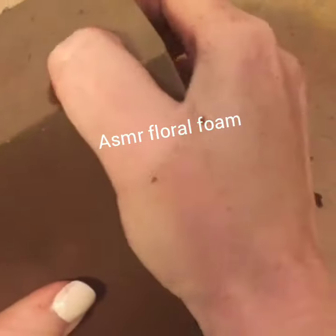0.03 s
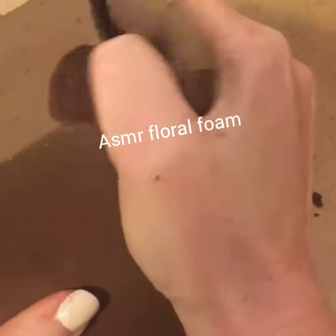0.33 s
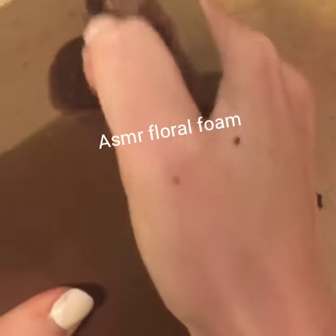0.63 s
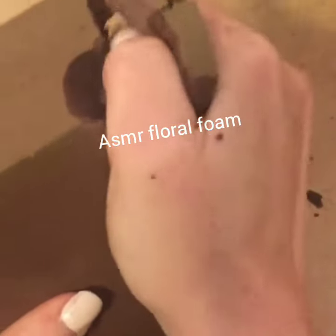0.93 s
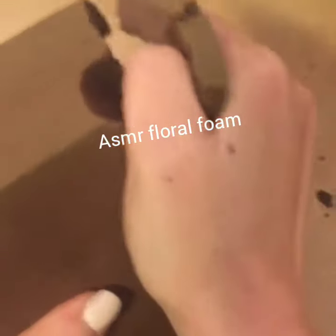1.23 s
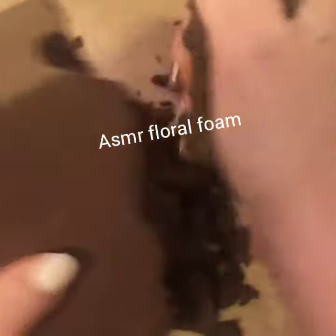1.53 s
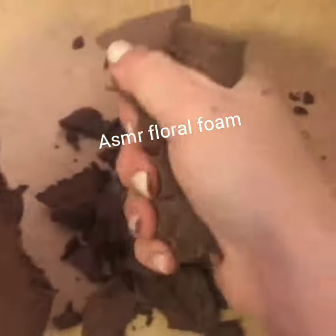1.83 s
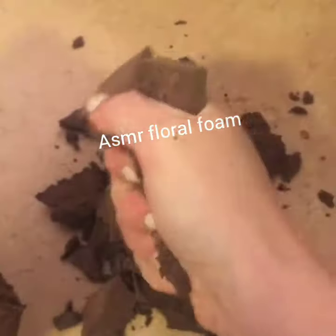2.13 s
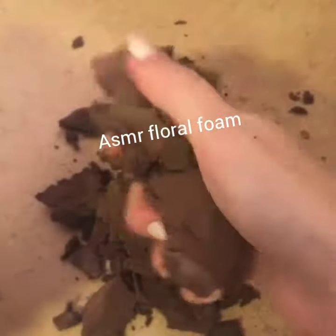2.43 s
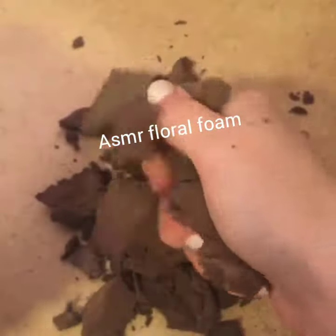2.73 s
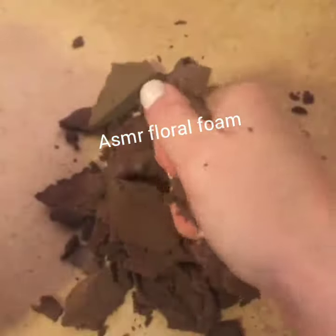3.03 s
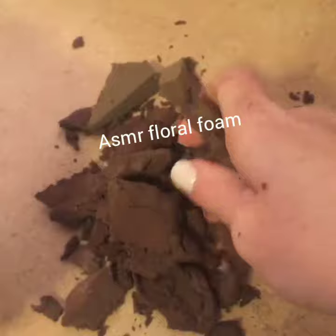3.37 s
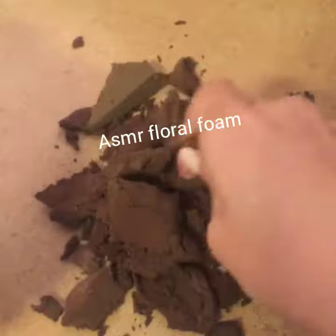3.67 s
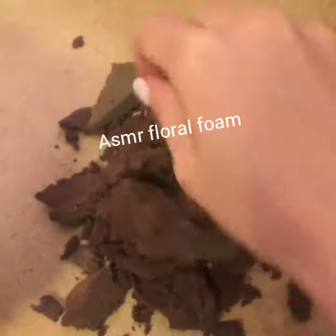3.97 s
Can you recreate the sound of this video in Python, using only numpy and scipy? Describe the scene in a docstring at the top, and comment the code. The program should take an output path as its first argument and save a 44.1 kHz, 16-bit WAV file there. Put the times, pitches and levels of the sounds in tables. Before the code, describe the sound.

Dry floral foam crunches and cracks as a hand crushes it to crumbs.

```python
"""A hand breaks dry floral foam close to a phone, in a small room where an appliance motor hums faintly.
First the fingers crunch into the block: brittle cell walls collapse in dense showers of clicks, with
sharp fractures and hollow knocks. Just after a second comes the loudest crack, and a lump bumps on
the table. The hand gathers the lumps and grinds them to crumbs, some snapping with a tick.
From about three seconds on, the pieces rub softly and die away."""
import sys
import numpy as np
from scipy import signal
from scipy.fft import rfft, irfft
from scipy.io import wavfile

SR = 44100
rng = np.random.default_rng(int(sys.argv[2]) if len(sys.argv) > 2 else 0)


def to_wav(sig):
    """Store sig (one row per channel, or 1-D mono) as 16-bit WAV at the path in sys.argv[1].

    Samples outside -1..1 are clipped; the rate is SR.
    """
    pcm = np.clip(np.atleast_2d(sig), -1, 1) * 32767
    pcm = np.round(pcm).astype(np.int16)
    wavfile.write(sys.argv[1], SR, pcm.T)  # frames by channels


N = 176400
TOP_HZ = 13850  # upper edge of the phone's range
FREQS = np.maximum(np.arange(2049) * SR / 4096, 1)  # f/Hz grid of every EQ curve

# tone colour of loose crumbs: f/Hz, level/dB
CRUMB_EQ = [(750, -5.5), (1500, 0), (2700, -3), (3700, 0), (5000, -2.5), (6200, 0.5), (7900, -1.5),
            (12500, -1.5)]


def undb(db):
    """Decibels to gain."""
    return 10 ** (np.asarray(db) / 20)


def unit(x):
    """Scale to rms 1."""
    return x / np.sqrt(np.mean(x ** 2) + 1e-18)


def add(out, x, start):
    """Mix x into out from start seconds on."""
    i = int(round(start * SR))
    a, b = max(i, 0), min(i + len(x), len(out))
    if b > a:
        out[a:b] += x[a - i:b - i]


def wander(turns_per_s, size):
    """A random modulator of rms 1, gliding from value to value."""
    position = np.arange(size) * turns_per_s / SR
    return unit(np.interp(position, np.arange(512), rng.standard_normal(512)))


def colour(points, tilt_db=0):
    """An EQ curve in dB through the points, tilted by tilt_db per octave about 4 kHz."""
    hz, db = np.array(points).T
    octaves = np.log2(np.clip(FREQS, 700, 14000) / 4000)
    return np.interp(np.log(FREQS), np.log(hz), db) + tilt_db * octaves


def bell(hz, width_hz):
    """The outline of one resonance, 1 at its centre."""
    return 1 / (1 + (2 * (FREQS - hz) / width_hz) ** 2)


def equalise(x, curve_db):
    """Minimum-phase EQ, so clicks never pre-ring; white input keeps its power, counted below TOP_HZ."""
    gain = undb(curve_db)
    gain /= np.sqrt(np.mean(gain ** 2 * (FREQS < TOP_HZ)))
    cepstrum = irfft(np.log(gain))
    half = len(cepstrum) // 2
    cepstrum[1:half] *= 2
    cepstrum[half + 1:] = 0
    return signal.fftconvolve(x, irfft(np.exp(rfft(cepstrum))))


def appliance():
    """The bed: wavering motor tones over a low rush of air."""
    # motor tones: f/Hz, rms level/dB
    motor_tones = [(50.8, -53.5), (120, -55), (152, -54.5), (202.8, -48.5), (240, -54), (304.2, -60.5),
                   (354.8, -44.5), (559, -61)]
    # tone colour of the air: f/Hz, level/dB
    air_eq = [(20, -33), (50, -3.5), (85, -0.5), (400, -2.5), (500, -18), (800, -17), (1400, -32),
              (4000, -38), (14000, -38.5)]
    t, hum = np.arange(N) / SR, np.zeros(N)
    waver_db, air_db = 0.83, -45.5
    for hz, db in motor_tones:
        level = undb(db + waver_db * wander(1.3, N))
        phase = 2 * np.pi * (hz * t + rng.random()) + .2 * wander(6.6, N)
        hum += np.sqrt(2) * level * np.sin(phase)
    air = equalise(rng.standard_normal(N), colour(air_eq))[:N]
    return hum + undb(air_db) * air


def room(x):
    """A small room adds a short tail after 4 ms of pre-delay."""
    t60_s, wet_db = 0.19, -16.5
    t = np.arange(SR // 3) / SR
    tail = rng.standard_normal(len(t)) * undb(-60 * t / t60_s) * (t > .004)
    return x + signal.fftconvolve(x, undb(wet_db) * tail / np.linalg.norm(tail))[:N]


def early_reflections(x):
    """Hand and table throw the sound straight back and thicken each click."""
    decay_s, wet_db = 0.0072, -13
    t = np.arange(SR // 50) / SR
    echoes = rng.standard_normal(len(t)) * np.exp(-t / decay_s)
    return x + signal.fftconvolve(x, undb(wet_db) * echoes / np.linalg.norm(echoes))[:len(x)]


def lump_drop():
    """The light, broken-off lump lands on the table with a dull bump."""
    start_s, hz, db, rise_s = 1.162, 85, -27.5, 0.0079
    t = np.maximum(np.arange(N) / SR - start_s, 0)
    envelope = t / rise_s * np.exp(1 - t / rise_s)
    return undb(db) * envelope * np.sin(2 * np.pi * hz * t)


def cell_clicks(size, clicks_per_s, spread_db):
    """Cell walls snap at random: many small clicks and a few large ones."""
    hits = rng.random(size) < clicks_per_s / SR
    polarity = rng.choice([-1, 1], size)
    strength = undb(spread_db * np.clip(rng.standard_normal(size), -3, 3))
    return unit(hits * polarity * strength)


def squeeze(peak, rise, fall, clicks_per_s, spread_db, jerk_db):
    """A click shower that swells and ebbs in jerks (rise and fall span 20 dB), and its start time."""
    swell_curve, jerks_per_s = 1.284, 160
    t = np.arange(-SR // 5, SR // 5) / SR
    swell = undb(-20 * np.abs(t / np.where(t < 0, rise, fall)) ** swell_curve)
    clicks = cell_clicks(len(t), clicks_per_s, spread_db)
    jerks = undb(jerk_db * wander(jerks_per_s, len(t)))
    return early_reflections(swell * clicks * jerks), peak + t[0]


def hollows(depth_db=5, bands=40):
    """Gaps between fingers and pieces resonate anew with every grip: a random EQ curve."""
    return depth_db * np.interp(FREQS, np.linspace(0, TOP_HZ, bands), rng.standard_normal(bands))


def friction(strokes, eq_points, pieces=3):
    """Loose pieces shed powder against each other; they catch in turn, so the colour keeps shifting."""
    out, clicks_per_s = np.zeros(N), 7400
    for peak, db, rise, fall, tilt_db in strokes:
        for _ in range(pieces):
            grit, start = squeeze(peak, rise, fall, clicks_per_s / pieces, spread_db=2.5, jerk_db=2.5)
            eq = colour(eq_points, tilt_db) + hollows()
            add(out, undb(db) / np.sqrt(pieces) * equalise(grit, eq), start)
    return out


def rubs():
    """Lumps rub on each other as the hand gathers them."""
    # gathering strokes: peak t/s, level/dB, rise/s, fall/s, tilt/(dB per octave)
    strokes = [(0.49, -45, 0.053, 0.2, 0), (1.325, -32, 0.063, .035, -1.6),
               (1.385, -32, 0.094, 0.095, -0.5), (1.448, -30, 0.085, 0.027, -2),
               (2.375, -40.5, 0.059, 0.08, -1), (3.2, -48.5, 0.17, 0.12, -1), (3.358, -41, 0.014, 0.033, 2),
               (3.45, -39.5, 0.18, 0.13, 1.2), (3.547, -27.5, 0.065, 0.04, 0),
               (3.625, -38.5, 0.081, 0.055, 4), (3.78, -50, 0.08, 0.078, 1.5)]
    # tone colour of the lumps: f/Hz, level/dB
    lump_eq = [(100, -18.5), (1000, -7.5), (1500, -5.5), (2150, 2), (2900, -1), (4100, 1), (5000, -4.5),
               (7000, -2.5), (13000, -5.5)]
    return friction(strokes, lump_eq)


def grinds():
    """The fist grinds loose pieces to crumbs."""
    # grinding strokes: peak t/s, level/dB, rise/s, fall/s, tilt/(dB per octave)
    strokes = [(1.51, -34, 0.12, 0.063, -0.4), (1.614, -31.5, 0.024, 0.027, 3.5),
               (1.68, -33, 0.19, 0.24, 0.5), (1.785, -28, 0.17, 0.22, 2), (1.875, -33, 0.061, 0.16, 5),
               (1.985, -27.5, 0.077, 0.062, 1), (2.07, -30.5, 0.17, 0.09, 1), (2.14, -38.5, 0.1, 0.034, 4),
               (2.305, -43, 0.074, 0.13, 2), (2.468, -37.5, 0.032, 0.052, 2), (2.62, -37, 0.18, 0.14, 2),
               (2.725, -29.5, 0.12, 0.074, 2.5), (2.8, -30, 0.15, .14, 2.5),
               (2.968, -38.5, 0.066, 0.028, 4.5), (3.102, -34, 0.029, 0.024, 3.5)]
    return friction(strokes, CRUMB_EQ)


def snaps():
    """A crumb breaks with a tick, pitched by its size, and sheds a little dust."""
    # breaking crumbs: t/s, level before boost/dB, f/Hz
    ticks = [(0.2628, -19, 6000), (.522, -28.5, 10600), (1.376, -28.5, 3600), (1.61, -26, 1790),
             (1.653, -21, 1480), (1.656, -25.5, 1580), (1.74, -20.5, 1460), (1.784, -25, 8000),
             (1.841, -24, 10000), (1.886, -20.5, 4250), (1.9037, -24.5, 2580), (1.954, -21.5, 5100),
             (1.959, -18, 6000), (1.978, -17.5, 8500), (1.988, -16, 5200), (1.9919, -17, 905),
             (2.735, -10.5, 4400), (2.789, -22, 5000), (2.926, -34.5, 2410), (3.279, -43.5, 3500),
             (3.956, -47, 3500)]
    tick_decay_s, dust_decay_s, dust_db, boost_db = 0.00024, 0.0037, -10, 6.5
    out, t = np.zeros(N), np.arange(SR // 20) / SR
    envelope = np.exp(-t / tick_decay_s) + undb(dust_db) * np.exp(-t / dust_decay_s)
    for start, db, hz in ticks:
        tick = envelope * rng.choice([-1, 1], len(t))
        # a broad 7 dB peak, with skirts falling 2 dB per octave
        eq = colour(CRUMB_EQ) + 7 * bell(hz, 1.2 * hz) - 2 * np.abs(np.log2(FREQS / hz))
        add(out, undb(db + boost_db) * equalise(tick, eq), start)
    return out


def knocks():
    """The block gives way under the fingers with a short hollow knock."""
    # hollow knocks: t/s, level/dB, f/Hz
    hits = [(0.104, -21.5, 370), (0.131, -27, 363), (0.153, -10.5, 170), (0.372, -14.5, 324),
            (0.386, -26.5, 300), (0.992, -19, 370), (1.156, -17, 135)]
    decay_s, relative_width, skirt_db = 0.0063, 0.4, 12
    out, t = np.zeros(N), np.arange(SR // 10) / SR
    for start, db, hz in hits:
        burst = rng.standard_normal(len(t)) * np.exp(-t / decay_s)
        eq = skirt_db * np.log10(bell(hz, relative_width * hz))
        add(out, undb(db) * equalise(burst, eq), start)
    return out


def block_colour(tilt_db, ring_db):
    """The firm block's EQ, its resonances boosted or cut by ring_db, heard through the cupped palm."""
    # tone colour of the block: f/Hz, level/dB
    block_eq = [(40, -31), (150, -10.5), (700, -8.5), (1150, -5.5), (1700, -1.5), (2200, -2.5), (3200, -1),
                (4900, -2), (5800, -1), (7400, -3.5), (14000, -5.5)]
    # resonances of the block in the hand: f/Hz, width/Hz, share of ring_db
    block_modes = [(2806, 780, 1), (3560, 230, 0.38), (3965, 990, 0.71)]
    # resonances of the cupped palm: f/Hz, width/Hz, level/dB
    palm_modes = [(886, 210, 3.5), (1440, 190, 2.5)]
    ring = sum(share * bell(hz, width) for hz, width, share in block_modes)
    palm = sum(db * bell(hz, width) for hz, width, db in palm_modes)
    return colour(block_eq, tilt_db) + palm + ring_db * ring


def crunches():
    """Fingers sink into the firm block and crush its cells by the thousand."""
    # finger presses: peak t/s, level/dB, rise/s, fall/s, tilt/(dB per octave), block ring/dB
    presses = [(.003, -16, 0.056, 0.06, -1.5, 1.5), (0.104, -19, 0.053, 0.033, 0.1, -1.5),
               (.147, -17, 0.055, 0.031, -0.7, -2), (0.206, -32.5, 0.096, 0.13, 0.5, -2),
               (.276, -22.5, 0.029, 0.1, -0.6, -3), (.325, -22, 0.087, .04, 4.5, 1),
               (.371, -11.5, 0.042, 0.033, -1.7, 1.5), (0.604, -24.5, 0.067, 0.088, 0.5, 3),
               (0.65, -23.5, 0.038, 0.069, .5, 1), (.766, -26.5, 0.047, 0.1, 1, 3.5),
               (.802, -19, 0.062, .08, -0.96, 4), (0.896, -29, 0.079, 0.1, -0.5, 5),
               (0.959, -21, 0.072, 0.09, -1.5, -0.5), (1.024, -16, 0.027, 0.03, -1.3, 4),
               (1.058, -28, 0.024, 0.058, -0.5, -3.5), (1.131, -23, 0.032, 0.066, -2.4, 0.5),
               (1.177, -24.5, 0.021, 0.032, -1.5, -3.5)]
    out = np.zeros(N)
    for peak, db, rise, fall, tilt_db, ring_db in presses:
        crunch, start = squeeze(peak, rise, fall, clicks_per_s=9000, spread_db=5, jerk_db=1.1)
        add(out, undb(db) * equalise(crunch, block_colour(tilt_db, ring_db)), start)
    return out


def cracks():
    """A fracture tears a run of cells within milliseconds; with each one a hollow rings at a pitch of its own."""
    # fractures: t/s, level/dB, hold/s, tilt/(dB per octave), block ring/dB, hollow f/Hz
    fractures = [(0.1024, -4.5, 0.0016, 0.3, 7, 1000), (0.1272, -5.5, 0.0017, 1, 4.5, 2660),
                 (.152, -3.5, 0.006, -1.75, 1.5, 1490), (0.3093, -10.5, 0.0025, 0, 1.5, 1550),
                 (0.3424, -8, 0.0058, 0.6, 1, 900), (0.365, -8.5, 0.0037, 2, -15, 5600),
                 (0.373, -6, 0.0057, 0.5, 6, 2900), (0.3852, -9, .002, -2, -9.5, 1890),
                 (0.6525, -14, 0.0012, 0.5, 5.5, 5840), (0.9805, -10, 0.0026, -1.5, 12.5, 3900),
                 (0.992, -8.5, 0.0037, 1.2, 16, 1550), (1.1474, 0, 0.0051, 0, 6, 5870),
                 (1.1582, -17, 0.0028, 1.5, 13, 3400), (3.539, -28, 0.0037, 0, 1, 2230)]
    decay_s, hollow_ring_db = 0.0023, 7.5
    out, t = np.zeros(N), np.arange(SR // 10) / SR
    for start, db, hold, tilt_db, ring_db, hz in fractures:
        envelope = np.exp(-np.maximum(t - hold, 0) / decay_s)
        tear = envelope * cell_clicks(len(t), clicks_per_s=16000, spread_db=4)
        eq = block_colour(tilt_db, ring_db) + hollow_ring_db * bell(hz, width_hz=300)
        add(out, undb(db) * equalise(tear, eq), start)
    return out


def scene():
    """The foam in its room over the appliance bed, in mono on both channels."""
    foam = crunches() + cracks() + knocks() + lump_drop() + grinds() + rubs() + snaps()
    mono = appliance() + room(foam)
    return np.array([mono, mono])


def record(dry):
    """The phone soft-clips the loudest cracks and cuts the top end."""
    clipped = dry / (1 + dry ** 4) ** .25
    high_cut = signal.ellip(10, .2, 80, TOP_HZ, fs=SR, output="sos")
    return signal.sosfilt(high_cut, clipped)


dry = scene()
out = record(dry)
to_wav(out)
```